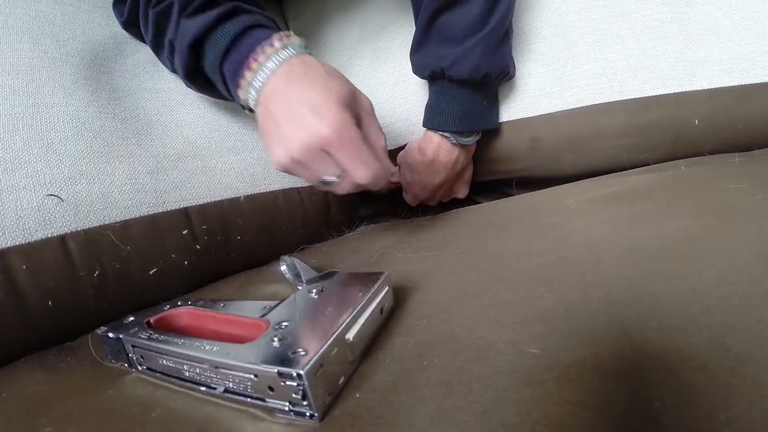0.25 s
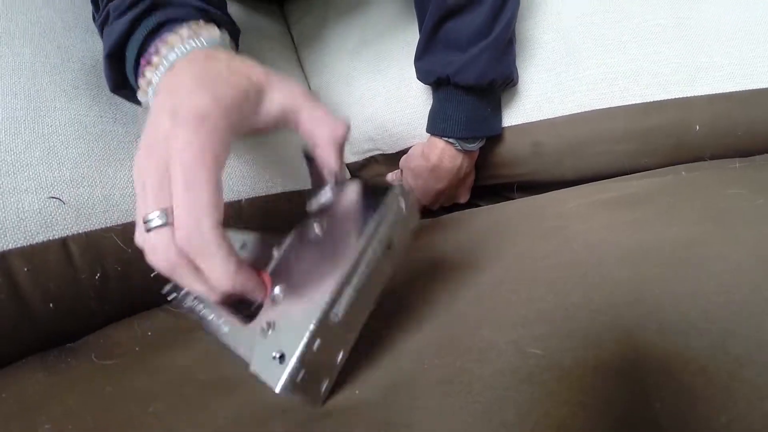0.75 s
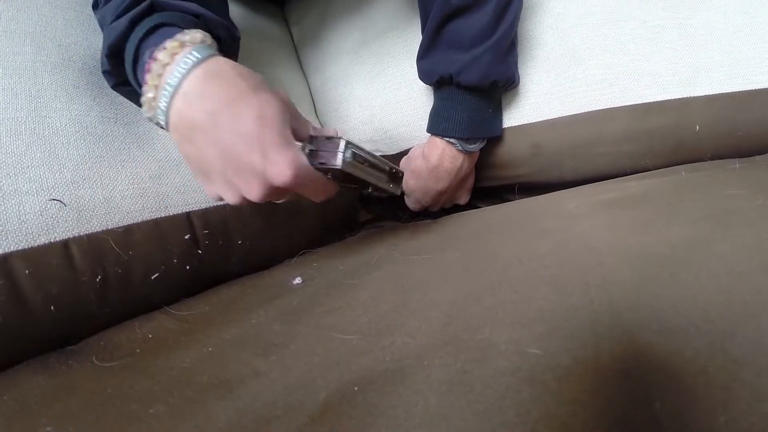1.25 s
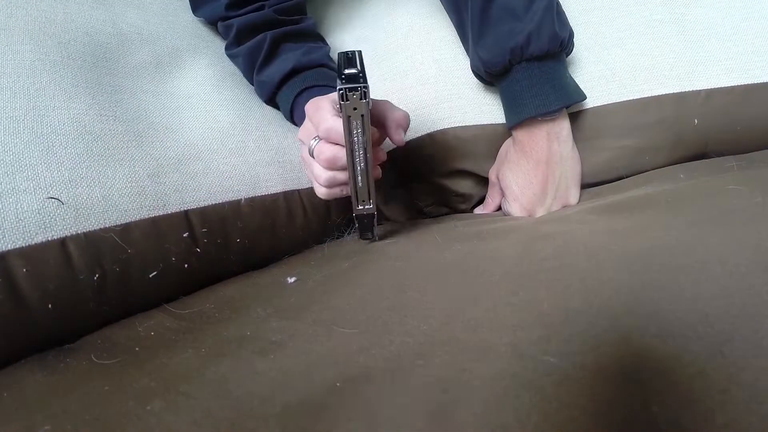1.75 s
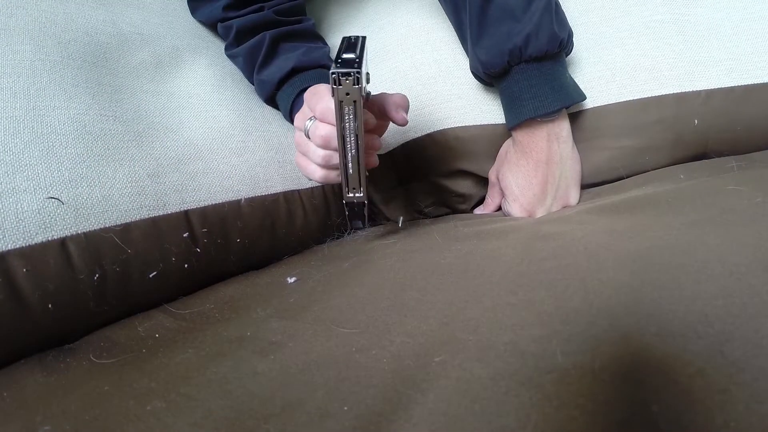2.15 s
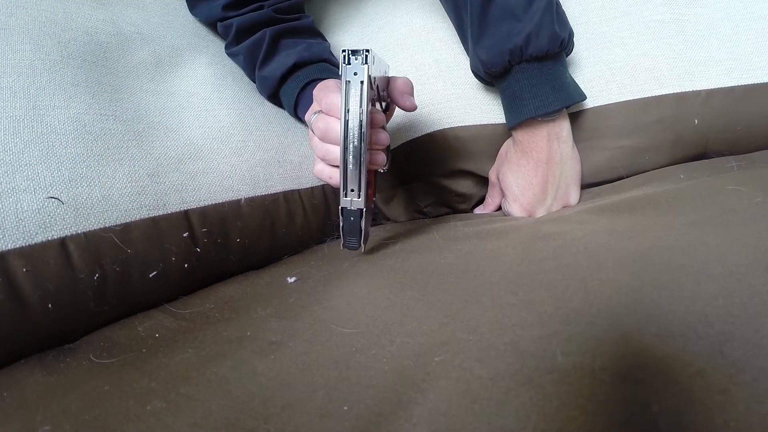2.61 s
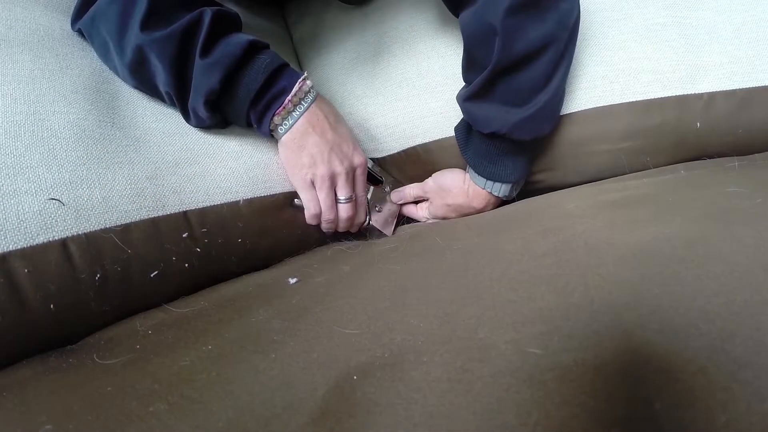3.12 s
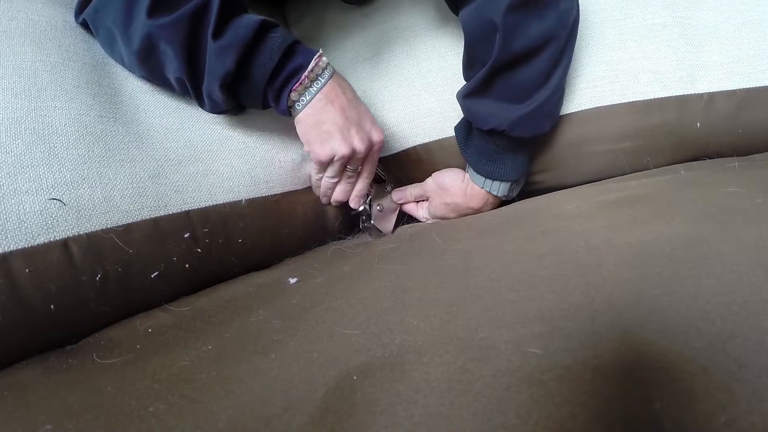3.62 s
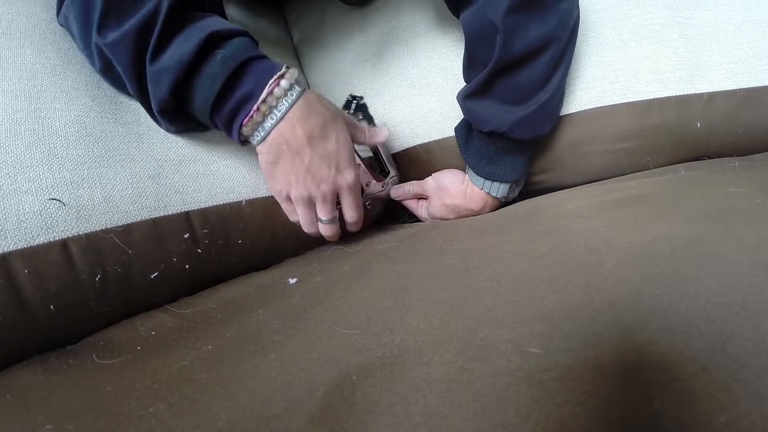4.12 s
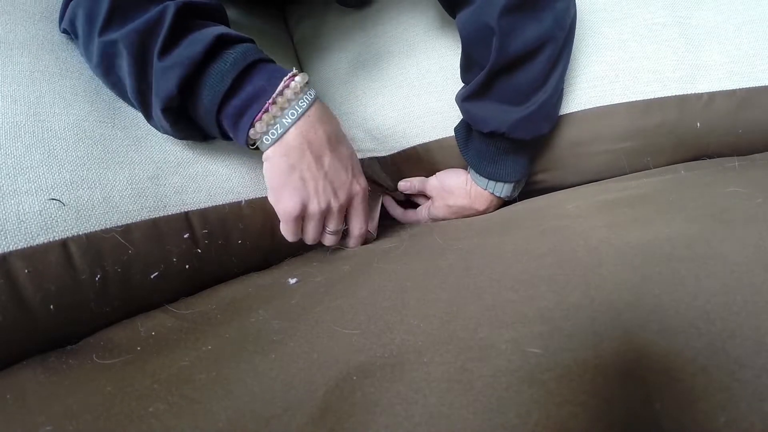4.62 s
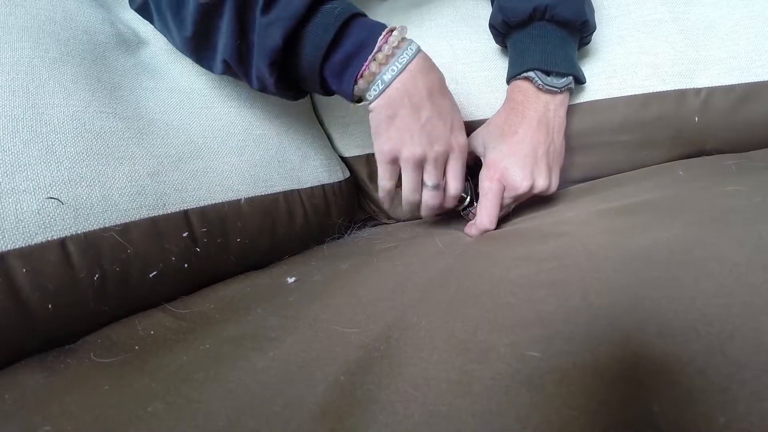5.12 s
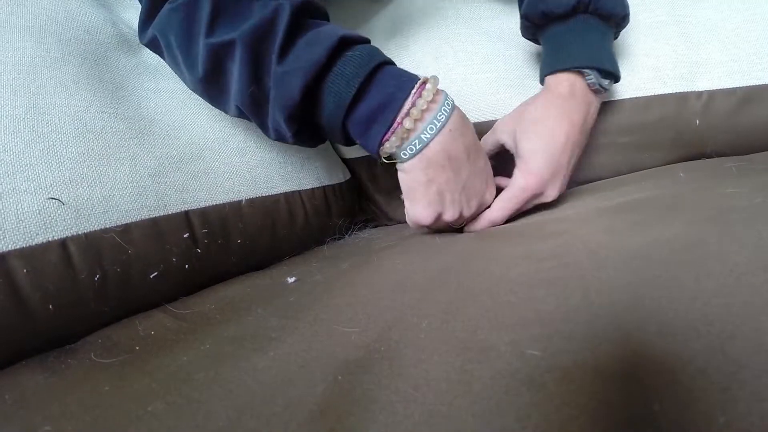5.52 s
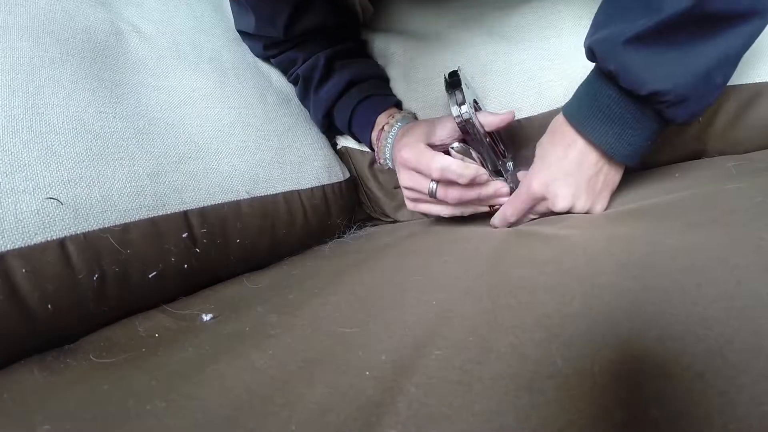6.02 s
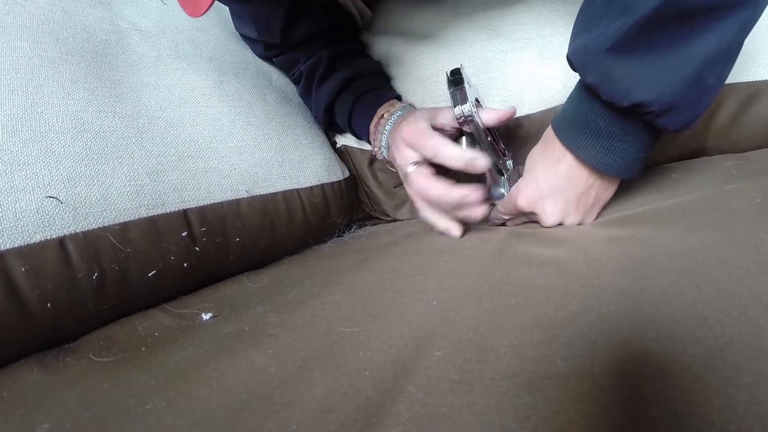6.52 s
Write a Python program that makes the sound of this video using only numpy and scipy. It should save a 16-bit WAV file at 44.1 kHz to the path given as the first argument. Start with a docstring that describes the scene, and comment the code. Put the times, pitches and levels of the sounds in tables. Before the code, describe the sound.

Close up in a quiet room, a steel staple gun is picked up with clacking metal, cloth rustles and a finger squeaks briefly on fabric. Four violent snaps follow over several seconds, each ringing steel, knocking wood and rattling staples. Small lever clicks and faint creaks fill the gaps. The small recorder distorts on the shots and the background dips after them.

```python
"""A steel hand stapler is handled and fired four times against an upholstered wooden frame in a quiet room.
First come room tone, rumble, cloth hiss and faint ticks: shaped noise; then clicks of lever, latch and staples.
The cushion heaves (damped sine) amid dull scuffs, a finger squeaks (falling tone), thin rings linger (modes).
Each shot bursts as noise, rings steel and wood, rebounds and rattles on; further clicks and low groans come between.
A small recorder overloads on the shots and its gain control ducks the room afterwards."""
import sys
import numpy as np
from scipy import signal
from scipy.fft import rfft, irfft
from scipy.io import wavfile
from scipy.ndimage import uniform_filter1d, minimum_filter1d

SR = 44100
rng = np.random.default_rng(int(sys.argv[2]) if len(sys.argv) > 2 else 0)


def int16_out(signal):
    """Quantize to a 16-bit WAV file."""
    q = np.round(np.clip(np.atleast_2d(signal).T, -1, 1) * 32767)
    wavfile.write(sys.argv[1], SR, q.astype(np.int16))


N = 297675

# spectrum shared by the rattle and the room reply: f/Hz, relative level per Hz/dB
ECHO_SPECTRUM = [(300, 3), (900, -9.5), (1500, -5), (3000, -0.5), (11000, -2.5), (14000, -11.5),
                 (16000, -20.5)]


def amp(db):
    """Level definition: decibels to an amplitude ratio."""
    return 10 ** (np.asarray(db) / 20)


def coloured(spectrum, size):
    """Spectral shaping: white noise weighted over log frequency, scaled to rms 1."""
    hz, level_db = np.transpose(spectrum)
    bins = np.maximum(np.arange(size // 2 + 1) * SR / size, 1)
    weights = amp(np.interp(np.log(bins), np.log(hz), level_db))
    x = irfft(rfft(rng.standard_normal(size)) * weights, size)
    return x / x.std()


def drift(rate_hz):
    """Slow random modulation: Gaussian knots of spread 1, joined by straight lines."""
    knots = rng.standard_normal(int(N / SR * rate_hz) + 2)
    return np.interp(np.arange(N) / SR * rate_hz, np.arange(len(knots)), knots)


def band(x, low_hz, high_hz):
    """Band limitation: a Butterworth band-pass."""
    sos = signal.butter(2, [low_hz, high_hz], "band", fs=SR, output="sos")
    return signal.sosfilt(sos, x + 1e-18)


def swell(middle_s, length_s):
    """Gaussian envelope: a smooth rise and fall of height 1."""
    return np.exp(-8 * ((np.arange(N) / SR - middle_s) / length_s) ** 2)


def resonate(force, hz, width_hz):
    """Damped oscillator: a unit click sets a decaying sine of initial height 1 ringing."""
    r, w = np.exp(-np.pi * width_hz / SR), 2 * np.pi * hz / SR
    return signal.lfilter([0, np.sin(w)], [1, -2 * r * np.cos(w), r * r], force + 1e-18)


def struck(modes, at, level_db, centre_hz, db_per_octave, spread_db, force):
    """Modal excitation: each blow favours modes near its own pitch; a running force shakes them all."""
    out = np.zeros(N)
    luck = rng.standard_normal((len(at), len(modes)))
    for k, (hz, width_hz, mode_db) in enumerate(modes):
        octaves_off = np.abs(np.log2(hz / centre_hz))
        blow_db = level_db - db_per_octave * octaves_off + spread_db * luck[:, k]
        blows = force.copy()
        np.add.at(blows, at, amp(blow_db))
        out += (-1) ** k * amp(mode_db) * resonate(blows, hz, width_hz)
    return out


def pushes(rows, width):
    """Band-limited friction noise: swells around a pitch, the width being a share of that pitch."""
    out = np.zeros(N)
    for middle_s, length_s, level_db, hz in rows:
        dull = band(rng.standard_normal(N), hz * (1 - width / 2), hz * (1 + width / 2))
        out += amp(level_db) * swell(middle_s, length_s) * dull / dull.std()
    return out


def room_tone():
    """Stationary background: shaped noise whose level wanders slightly."""
    # room tone spectrum: f/Hz, relative level per Hz/dB
    air_spectrum = [(35, -28.5), (60, 2.5), (145, -4.5), (285, -15.5), (333, -13.5), (373, -19), (418, -16),
                    (1180, -23), (2430, -38), (13200, -54)]
    return amp(-50.5 + 0.54 * drift(3.7)) * coloured(air_spectrum, size=N)


def handling_rumble():
    """Low-frequency handling noise: shaped noise under a lumpy level curve."""
    # rumble spectrum: f/Hz, relative level per Hz/dB
    rumble_spectrum = [(12, -16.5), (22, 16), (50, 16.5), (100, -3.5), (170, -49)]
    # level curve before its random drift: t/s, level/dB
    handling_curve = [(0.0, -58), (0.75, -46), (1.11, -62), (1.52, -42.5), (2.2, -58), (2.74, -49.5),
                      (4.06, -55), (5.32, -45.5), (5.51, -48), (6.47, -56.5), (6.75, -55.5)]
    times_s, levels_db = np.transpose(handling_curve)
    level_db = np.interp(np.arange(N) / SR, times_s, levels_db)
    return amp(level_db + 1.2 * drift(6)) * coloured(rumble_spectrum, size=N)


def cloth():
    """Fibre friction: hiss swells as sleeves and hands sweep the cloth, flickering as fibres catch and let go."""
    # cloth hiss spectrum: f/Hz, relative level per Hz/dB
    hiss_spectrum = [(500, -21.5), (1200, -0.5), (2500, -2), (5000, -8.5), (9000, -16.5), (13200, -25.5),
                     (13800, -67)]
    # sweeps before the flicker: middle t/s, length/s, level/dB
    cloth_sweeps = [(0.176, 0.14, -62), (0.442, 0.19, -61.5), (0.775, 0.88, -70.5), (1.35, 0.31, -64),
                    (1.443, 0.022, -49), (1.533, 0.077, -51.5), (3.965, 0.088, -68), (4.586, 0.091, -71.5),
                    (4.886, 0.029, -59), (5.741, 0.44, -65), (6.602, 0.067, -46)]
    sweeps = np.full(N, amp(-65.5))  # the hands are never quite still
    for middle_s, length_s, level_db in cloth_sweeps:
        sweeps += amp(level_db) * swell(middle_s, length_s)
    catches = band(rng.standard_normal(N), 40, 270)
    flicker_db = 1.1 * drift(24) + 1.0 * catches / catches.std()
    return sweeps * amp(flicker_db) * coloured(hiss_spectrum, size=N)


def ticks():
    """Random impacts: sparse, uneven ticks of loose parts, each a short decaying burst of bright grit."""
    per_s, floor_db, spread_db, t60_s = 10, -58.5, 0.5, 0.015
    heights = amp(floor_db + spread_db * np.minimum(rng.exponential(1, N), 3))
    born = (rng.random(N) < per_s / SR) * heights
    envelope = signal.lfilter([1], [1, -amp(-60 / (t60_s * SR))], born + 1e-18)
    return band(envelope * rng.standard_normal(N), 1800, 9000)


def contacts():
    """Impact list: clicks, shots and the driver's rebounds, one array per property, and the shot count."""
    # shots: t/s, blow level/dB, frame knock before the common knock gain/dB, brightness/dB,
    # ring centre f/Hz, knock centre f/Hz, rise/s, rattle t60/s
    shots = [(1.9737, 1, -36, 1.5, 6320, 566.6, .0005, 0.47),
             (3.6623, -3, -13, -2.5, 2830, 465, 0.0012, 0.35),
             (4.9167, -0.5, -9, -5, 2230, 343, .0026, 0.33),
             (6.3359, -3.5, -15.5, -0.5, 4030, 352, 0.0026, 0.34)]
    # clicks of lever, latch and staple strip: t/s, level/dB, frame knock before the common knock gain/dB,
    # brightness before the click treble gain/dB, ring centre f/Hz
    clicks = [(0.6848, -21, -21.5, -11.5, 2350), (0.9833, -15.5, -44, -8, 2440),
              (0.9946, -18.5, -38, -19, 6200), (1.003, -27.5, -42, -10, 1450), (1.028, -33, -36, -21, 4390),
              (1.123, -47, -24, -20, 3570), (1.2151, -39.5, -16, -3, 2450), (1.4377, -24, -25, -6, 1450),
              (1.457, -49, -20, -20, 1860), (1.4684, -36.5, -5, -31, 1890), (1.48, -46, -7, -26, 1670),
              (1.723, -24, -25, -21.5, 4630), (1.781, -25.5, -39, -15.5, 5460),
              (1.7906, -33.5, -26.5, -24, 3970), (2.1903, -40, -16.5, -11.5, 4170),
              (2.199, -47, -23, -4, 8700), (2.2338, -38, -10.5, -15, 2240), (2.2528, -23.5, -34, -8, 4250),
              (2.3094, -41, -29, -11, 6530), (2.3533, -25, -37, -16, 1586), (2.3638, -21, -36, -20, 1580),
              (2.3678, -6.5, -41, -12.5, 3450), (2.3816, -20.5, -34, -18, 1440),
              (2.392, -33, -33, -13, 1520), (2.3976, -28, -36, -22, 3390),
              (2.6275, -45.5, -10.5, -33.5, 3550), (3.1486, -47.5, 2, -37.5, 1570),
              (3.2989, -47.5, -7, 0, 1977), (3.443, -41, -2, -26, 1860), (3.4986, -29, -8.5, -1, 1640),
              (3.5034, -22, -35, -22.5, 1864), (3.509, -29.5, -20, -13.5, 2830),
              (3.9583, -36, -8, -17.5, 1830), (3.967, -41, -1.5, -8.5, 6550),
              (4.0736, -34.5, -25.5, -1, 2200), (4.086, -35.5, -25, -6, 2620),
              (4.1729, -27, -30, -22, 2530), (4.1882, -17.5, -31.5, -11.5, 2096),
              (4.4412, -40, -25, -30, 3400), (4.5253, -39.5, -13, -10, 4420),
              (4.827, -32.5, -27, -9.5, 1480), (4.8393, -24, -19.5, -28, 2590),
              (4.872, -27.5, -29, -2, 1750), (5.105, -44, -3, -19, 4670), (5.111, -33, -4, -33, 1480),
              (5.138, -46.5, -18, 0, 8800), (5.1688, -29, -5, -12, 4080), (5.1973, -44, -2, -9, 3280),
              (5.219, -47.5, -15, -5, 7400), (5.254, -36, -8.5, -0.5, 3120), (5.2943, -31.5, -5, -31, 2203),
              (5.3707, -15.5, -7.5, -12.5, 2870), (5.6809, -35, -21, -12, 1740),
              (5.692, -38, -17, -15, 2230), (6.1345, -45.5, -15.5, -15, 1950),
              (6.1828, -26, -17.5, -14.5, 4720), (6.2079, -23, -13.5, -1.5, 1760),
              (6.295, -46.5, -10, 1, 4100), (6.527, -35.5, -28.5, -2.5, 1630),
              (6.572, -22.5, -5.5, -8.5, 6530), (6.5946, -27.5, -32, -15, 1640),
              (6.601, -38, -21, -12, 3570), (6.612, -37.5, 7.5, -17, 1580), (6.6357, -14.5, -17, -14, 6510)]
    # the driver bounces back 19 ms after each shot, 26.5 dB below the blow
    rebounds = [(s + 0.019, db - 26.5, -26, -9.5, 3900) for s, db, *_ in shots]
    # decay t60/s, ring level/dB, travel of the parts/s, rattle level/dB
    shot_rest = (0.014, -15.5, 0.0041, -33.5)
    # knock centre f/Hz, rise/s, rattle t60/s, then as for the shots
    click_rest = (304, 0.00092, 0.1, 0.016, -2, 0.001, -24.5)
    rows = [tuple(row) + shot_rest for row in shots]
    rows += [tuple(row) + click_rest for row in list(clicks) + rebounds]
    return np.array(rows).T, len(shots)


def metal_chatter(body, edge, deep, grit):
    """Impact noise: three bands of grit follow the contact envelopes."""
    middle = band(band(grit * body, 1250, 5500), 1000, 8200)
    treble = band(band(rng.standard_normal(N) * edge, 4200, 14000), 2000, 13000)
    low = amp(0.5) * band(rng.standard_normal(N) * deep, 380, 1400)
    return middle + treble + low


def staple_rattle(loose, thin):
    """Granular collisions: unevenly jostling staples, whose treble dies sooner than the rest."""
    grains = band(rng.standard_normal(N), 30, 310)
    jostle = amp(0.5 * grains / grains.std()) * coloured(ECHO_SPECTRUM, size=N)
    treble = band(jostle, 6000, 18000)
    return loose * (jostle - treble) + thin * treble


def steel_ring(at, level_db, centre_hz, force):
    """Modal ringing: contacts, click chatter and rattle excite the damped modes of the stapler body."""
    # stapler body modes: f/Hz, bandwidth/Hz, relative level/dB
    steel_modes = [(1520, 120, -5), (1860, 55, -4), (2230, 75, -5), (2600, 110, -6), (3080, 110, -6),
                   (3570, 150, -3), (4150, 150, -4), (4600, 130, -5), (5750, 80, -8), (6520, 95, -6),
                   (7400, 130, -9), (8800, 100, -12), (11200, 100, -13)]
    return struck(steel_modes, at, level_db, centre_hz, 17, 3.0, force)


def frame_knock(at, level_db, centre_hz, force):
    """Modal response: contacts and rattle excite the broad modes of the wooden frame."""
    # wooden frame modes: f/Hz, bandwidth/Hz, relative level/dB
    frame_modes = [(141, 13, -7.5), (260, 52.65, -3), (334, 160, 1), (486, 150, -5), (550.8, 34, -12.5),
                   (795, 67, -13)]
    return band(struck(frame_modes, at, level_db, centre_hz, 7.0, 2.4, force), 180, 2800)


def stapler():
    """Impact and resonance: each contact chatters, rings the body, knocks the frame and leaves a rattle."""
    columns, shot_count = contacts()
    (s, peak_db, knock_db, bright_db, centre_hz, knock_hz,
     rise_s, rattle_t60_s, t60_s, ring_db, travel_s, rattle_db) = columns
    click_treble_db, common_knock_db = 3, 8.5
    treble_dies_faster = 1.3  # ratio of decay rates in the rattle
    at, t = np.round(s * SR).astype(int), np.arange(SR // 2) / SR
    body, deep, edge, loose, thin, shudder = envelopes = np.zeros((6, N + len(t)))
    for k, i in enumerate(at):
        is_shot = k < shot_count
        span = slice(i, i + len(t))
        # steady while the parts travel, then dying
        fade = np.maximum(t - travel_s[k], 0) / t60_s[k]
        burst = amp(peak_db[k] - 60 * fade) * np.minimum(t / rise_s[k], 1) ** 2
        builds_s = 0.0075 if is_shot else 0.004
        after = amp(peak_db[k] + rattle_db[k] - 60 * t / rattle_t60_s[k])
        after *= np.minimum(t / builds_s, 1) ** 2
        body[span] += burst
        deep[span] += burst * is_shot  # only the driver is heavy enough to shake the lower midrange
        edge[span] += burst * amp(bright_db[k] + (0 if is_shot else click_treble_db))
        loose[span] += after
        thin[span] += after * amp(-60 * (treble_dies_faster - 1) * t / rattle_t60_s[k])
        shudder[span] += after * amp(knock_db[k])
    body, deep, edge, loose, thin, shudder = envelopes[:, :N]

    grit = rng.standard_normal(N)
    chatter = metal_chatter(body, edge, deep, grit)
    rattle = staple_rattle(loose, thin)
    contact = at + np.round(rise_s * SR).astype(int)
    # click chatter keeps the steel ringing; shots ring from their blow and rattle
    steel_force = amp(-53) * grit * (body - deep) + amp(-31.5) * rattle
    ring = steel_ring(contact, peak_db + ring_db, centre_hz, steel_force)
    frame_force = amp(-2.5) * rng.standard_normal(N) * shudder
    knock = frame_knock(contact, peak_db + knock_db + common_knock_db, knock_hz, frame_force)
    return chatter + rattle + ring + knock


def room(x):
    """Diffuse reverberation: convolution with decaying noise that builds up over the first milliseconds."""
    t60_s, onset_s = 0.22, 0.0057
    t = np.arange(SR // 2) / SR
    reply = coloured(ECHO_SPECTRUM, size=len(t)) * amp(-60 * t / t60_s)
    reply *= np.minimum(t / onset_s, 1) ** 2
    return signal.fftconvolve(x, reply / np.sqrt(np.sum(reply ** 2)))[:N]


def scuffs():
    """Damped broad-band response: the palm pushes on the padded frame and it answers dully."""
    # scuffs: middle t/s, length/s, level/dB, centre f/Hz
    palm_pushes = [(1.476, 0.35, -58.5, 403), (3.15, 0.043, -51, 690), (3.975, 0.071, -52, 358),
                   (4.593, 0.083, -49, 336), (5.75, 0.18, -50, 280), (6.633, 0.11, -43, 332)]
    return pushes(palm_pushes, 0.78)


def cushion():
    """Damped oscillation: weight shifts and the cushion's swings reach the microphone through its mount."""
    # heaves: t/s, initial level/dB, f/Hz, t60/s
    heaves = [(1.461, -20, 21, .26)]
    out = np.zeros(N)
    for s, peak_db, hz, t60_s in heaves:
        t = np.maximum(np.arange(N) / SR - s, 0)
        out -= amp(peak_db - 60 * t / t60_s) * np.sin(2 * np.pi * hz * t)
    return out


def squeak():
    """Stick-slip friction: a finger on the cover gives a scratchy tone, its pitch sagging as it slows."""
    middle_s, length_s, level_db = 1.532, 0.055, -43
    middle_hz, octaves_per_s, overtone_db = 2390, -15.5, -13
    since = np.clip(np.arange(N) / SR - middle_s, -length_s, length_s)
    hz = middle_hz * 2 ** (octaves_per_s * since)
    scratch = band(rng.standard_normal((2, N)), 65, 560)
    scratch /= scratch.std()
    phase = 2 * np.pi * np.cumsum(hz * (1 + 0.035 * scratch[0])) / SR
    tone = np.sin(phase) + amp(overtone_db) * np.sin(2 * phase)
    return amp(level_db) * swell(middle_s, length_s) * (1 + 0.55 * scratch[1]) * tone


def lingering_rings():
    """Lightly damped modes: a thin, lingering metallic ring after some clicks, its level fluttering."""
    # rings before the flutter: t/s, level/dB, f/Hz
    ring_onsets = [(1.784, -46, 5660), (2.31, -51, 6580), (3.302, -54, 2040), (3.51, -41.5, 5750),
                   (3.512, -45, 1940), (3.969, -54, 6500), (4.19, -41, 6480), (4.193, -39, 2180),
                   (5.257, -46, 2900), (6.212, -41, 1954)]
    out = np.zeros(N)
    for s, peak_db, hz in ring_onsets:
        impulse = np.zeros(N)
        impulse[round(s * SR)] = amp(peak_db)
        out += resonate(impulse, hz, width_hz=28)
    flutter = band(rng.standard_normal(N), 30, 150)
    return out * amp(5 * flutter / flutter.std())


def groans():
    """Narrow-band friction: the frame groans under load, near one pitch each time."""
    # groans: middle t/s, length/s, level/dB, centre f/Hz
    frame_groans = [(4.74, 0.069, -52, 487), (4.87, 0.061, -49, 332), (5.29, 0.11, -48.5, 483)]
    return pushes(frame_groans, 0.07)


def scene():
    """Superposition: the tool with its room reply, over the hands, cushion, frame and room tone."""
    background = room_tone() + handling_rumble() + cloth() + scuffs() + groans()
    tool = ticks() + stapler() + squeak() + lingering_rings()
    return (tool + amp(-25) * room(tool) + cushion() + background)[None]


def record(dry):
    """Gain control ducks after loud peaks, holds and recovers; its lag lets onsets clip; the top is cut."""
    duck_above_db, duck_share = -13.5, 0.71
    hold_s, release_db_per_s, attack_s = 0.19, 19.5, 0.0015
    level_db = 20 * np.log10(np.sqrt(uniform_filter1d(dry[0] ** 2, size=64) + 1e-12))
    over_db = duck_share * np.maximum(level_db - duck_above_db, 0)
    # running maximum over the hold time, then a straight-line release in decibels
    hold = int(hold_s * SR)
    held_db = -minimum_filter1d(-over_db, hold, origin=(hold - 1) // 2)
    ramp = release_db_per_s * np.arange(N) / SR
    duck_db = np.maximum.accumulate(held_db + ramp) - ramp
    r = np.exp(-1 / (attack_s * SR))
    smooth_duck_db = signal.lfilter([1 - r], [1, -r], duck_db)
    clipped = np.clip(dry * amp(-smooth_duck_db), -0.8, 0.8)
    return signal.sosfilt(signal.cheby2(12, 70, 16500, fs=SR, output="sos"), clipped)


dry = scene()
out = record(dry)
int16_out(out)
```